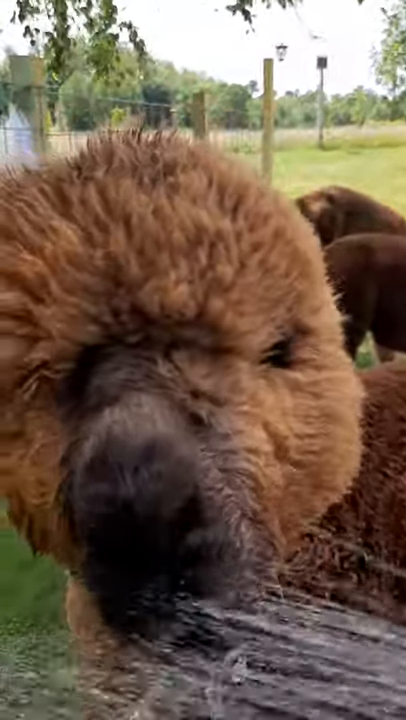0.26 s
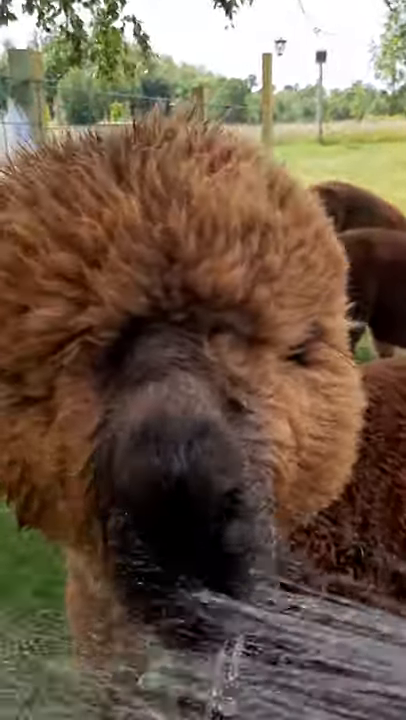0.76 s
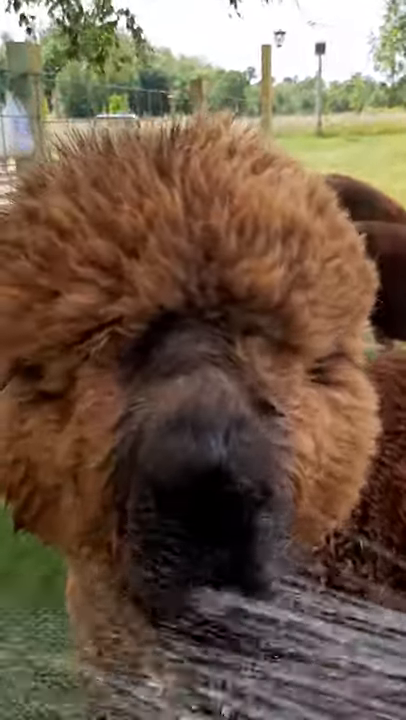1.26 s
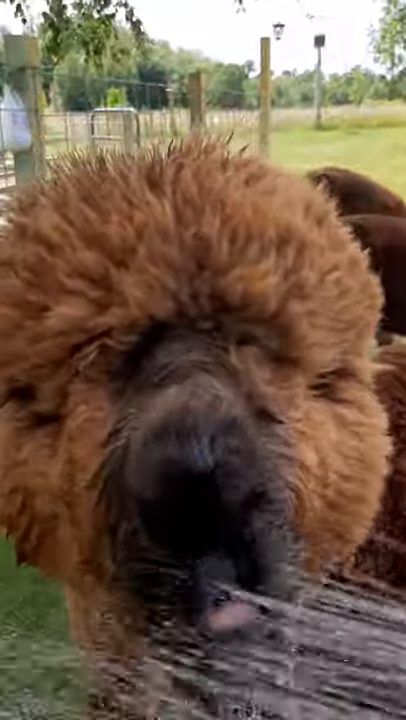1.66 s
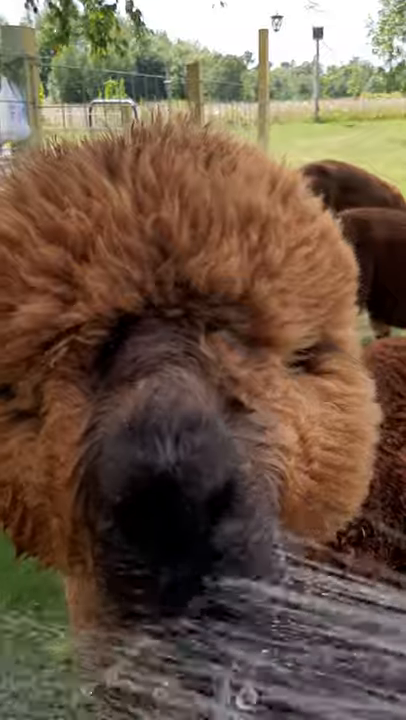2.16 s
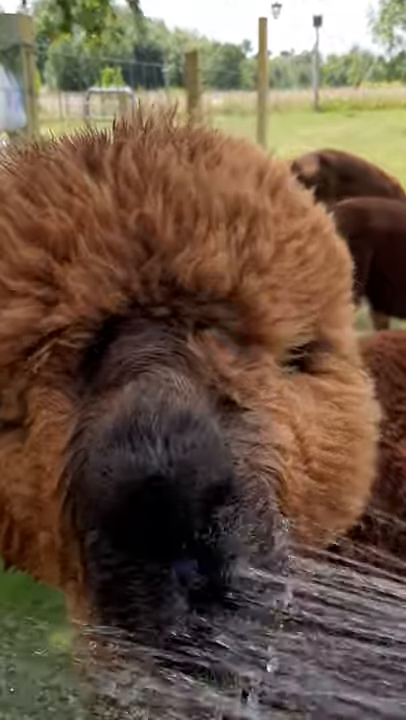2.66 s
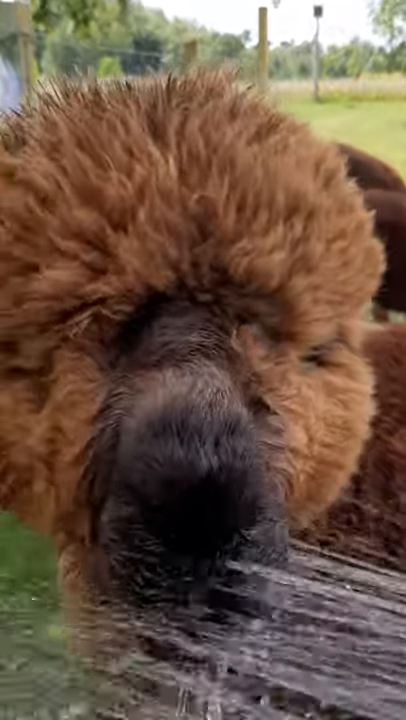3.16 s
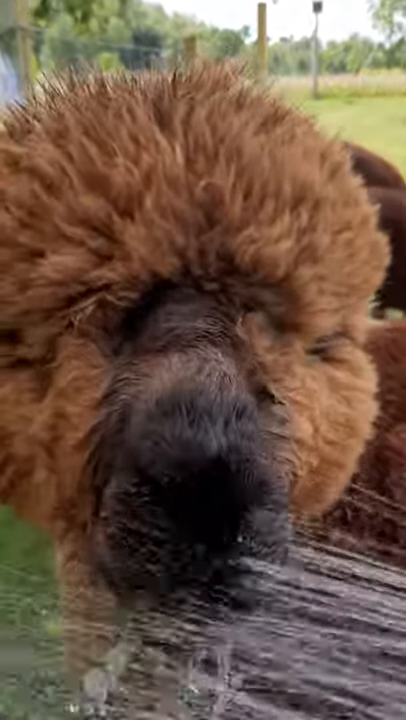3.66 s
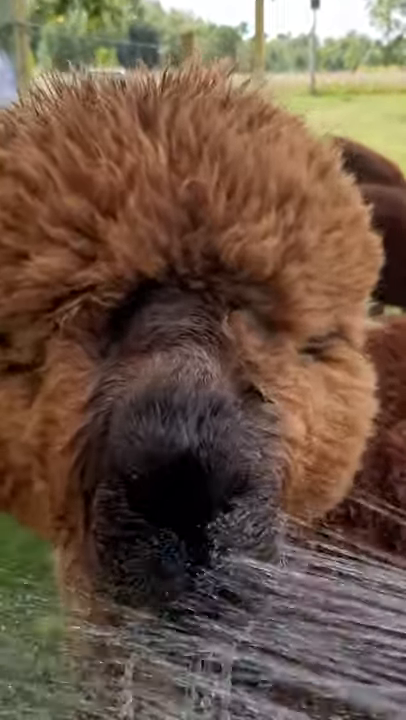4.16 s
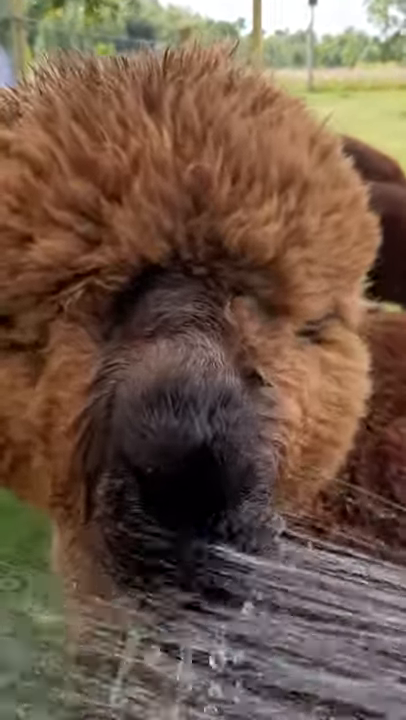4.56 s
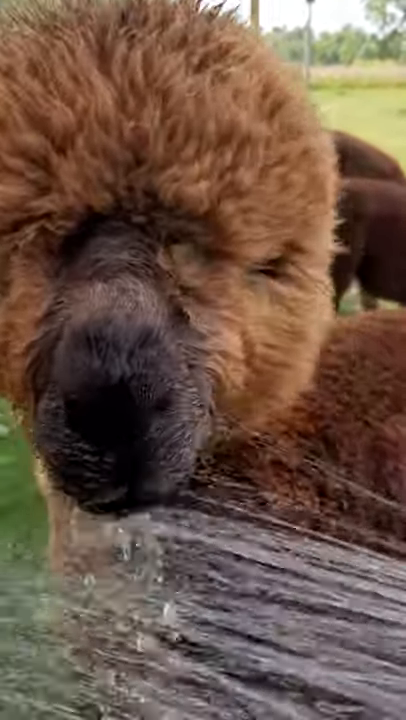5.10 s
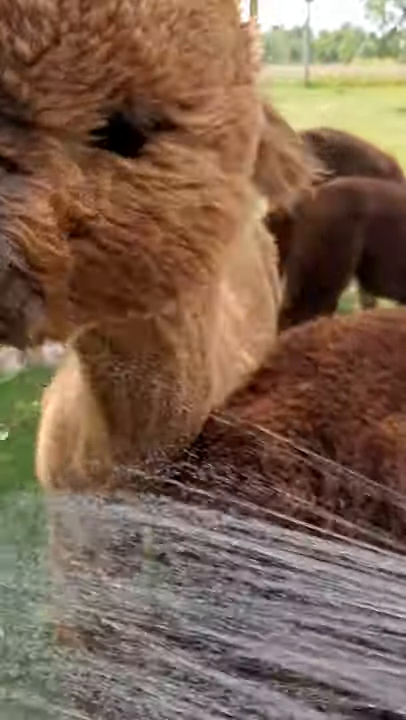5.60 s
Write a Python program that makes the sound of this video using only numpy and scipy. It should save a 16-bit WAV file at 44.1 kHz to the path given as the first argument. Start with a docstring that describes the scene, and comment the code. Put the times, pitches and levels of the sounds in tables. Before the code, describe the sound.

In an open paddock, an alpaca drinks from a hose spray right beside a stereo microphone. From the start, fine water hisses and crackles on its muzzle, over a quieter, steady patter on grass. Irregular short laps make swishy slurps, mostly gliding downward, mixed with bright wet lip smacks and hollow tongue clucks; a strong smack and clucks come near 2.0 seconds, and more clucks around 2.5. The spray strengthens after about 2.3. Low wind puffs buffet the microphone throughout, strongest around 2.7 to 3.0, with a sharp close drop slap at 2.9. Short watery gurgles come near 3.6 and 3.8, then the spray surges in brisk misty bursts from about 3.8 to 4.8 amid further smacks. A last slurp comes at 5.0. From about 5.2 the head turns away: the hiss falls off, leaving small drips, ticking drops, soft grass patter and fading breeze.

```python
"""An alpaca laps at the spray of a garden hose, close to the microphone, in an open paddock.
Each lap rings a mouth cavity with a gliding pitch; lips smack and the tongue clucks, as short decaying rings.
Showers of tiny grains over noise make the spray hiss on its muzzle and patter on the grass.
Shaped noise makes a light breeze that buffets the microphone. Near the end the head turns away and the spray fades."""
import sys
import numpy as np
from scipy import signal
from scipy.fft import rfft, irfft, next_fast_len
from scipy.io import wavfile
from scipy.ndimage import uniform_filter1d, map_coordinates

SR = 44100
rng = np.random.default_rng(int(sys.argv[2]) if len(sys.argv) > 2 else 0)


def output_pcm(signal):
    """Save a mono or channel-first signal as 16-bit PCM at the path in sys.argv[1].

    Samples are clipped to [-1, 1] before scaling.
    """
    pcm = np.clip(np.atleast_2d(signal).T, -1, 1) * 32767
    wavfile.write(sys.argv[1], SR, np.round(pcm).astype(np.int16))


N = 257455
TIME_S = np.arange(N) / SR


def amp(db):
    """Decibels to gain."""
    return 10 ** (np.asarray(db) / 20)


def unit(x):
    """Scale to rms 1."""
    return x / np.sqrt(np.mean(np.abs(x) ** 2) + 1e-20)


def along(points, hz):
    """Interpolate (Hz, value) points on a log frequency axis."""
    point_hz, values = np.transpose(points)
    return np.interp(np.log(hz + 1), np.log(point_hz + 1), values)


def curve(rows):
    """Interpolate (s, value) rows to one value per sample."""
    time_s, values = np.transpose(rows)
    return np.interp(TIME_S, time_s, values)


def wobble(rate_hz):
    """Smooth random curve, rate_hz knots a second."""
    knots = rng.standard_normal(int(N * rate_hz / SR) + 4)
    return map_coordinates(knots, [TIME_S * rate_hz])


def arch(middle_s, length_s):
    """Smooth rise from 0 to 1 and back."""
    return np.cos(np.pi * np.clip((TIME_S - middle_s) / length_s, -.5, .5)) ** 2


def filtered(x, response):
    """Multiply the spectrum of x by a response of frequency."""
    size = next_fast_len(N + SR // 4)
    spectrum = rfft(x, size) * response(np.fft.rfftfreq(size, 1 / SR))
    return irfft(spectrum, size)[..., :N]


def coloured(x, spectrum):
    """Shape x by a spectrum, at rms 1."""
    return unit(filtered(x, lambda hz: amp(along(spectrum, hz))))


def pan(left_db):
    """Channel gains for a left-minus-right level."""
    return amp([[left_db / 2], [-left_db / 2]])


def from_right(x, lag_s):
    """Sound reaches the right port lag_s before the left."""
    return filtered(x, lambda hz: np.exp(1j * np.pi * hz * lag_s * np.array([[-1], [1]])))


def add(track, start_s, sound):
    """Mix a sound into the track at start_s."""
    part = track[max(0, round(start_s * SR)):][:len(sound)]
    part += sound[:len(part)]


# Laps: (start [s], length [s], pitch at start [Hz], middle [Hz], end [Hz], relative level [dB])
LAPS = [(0.063, 0.089, 4000, 3280, 2460, -49), (0.145, 0.062, 3900, 3710, 3750, -45),
        (0.251, 0.016, 2500, 2520, 2700, -42.5), (0.372, 0.13, 4610, 1700, 810, -52.5),
        (0.498, 0.11, 4100, 3800, 3430, -49), (0.646, 0.11, 4200, 2780, 2460, -51),
        (1.085, 0.077, 4900, 3900, 2570, -46), (1.139, 0.018, 3475, 3175, 2900, -34),
        (1.303, 0.12, 4800, 3550, 3120, -48), (1.557, 0.094, 4300, 3040, 2470, -42.5),
        (1.729, 0.13, 3900, 3100, 2400, -47), (1.831, 0.06, 1884, 1570, 1700, -56),
        (2.06, 0.065, 2254, 2126, 2220, -51.5), (2.253, 0.094, 4200, 3500, 3130, -44),
        (2.427, 0.096, 4760, 3440, 2415, -39), (2.658, 0.11, 4190, 3410, 2930, -39),
        (2.779, 0.0563, 1730, 1117, 1750, -51), (2.916, 0.09, 1566, 1676, 1430, -53.5),
        (3.143, 0.069, 2050, 2080, 2440, -54), (3.737, 0.12, 3670, 4410, 3910, -44),
        (3.97, 0.086, 3400, 2400, 1350, -45.5), (4.444, 0.11, 4140, 3550, 2330, -47.5),
        (4.726, 0.041, 3260, 3060, 3470, -40.5), (4.76, 0.053, 2250, 1950, 2420, -50.5),
        (4.973, 0.11, 4320, 3300, 2180, -51)]


def laps(whistle_width_hz, swish_width_hz, scatter_db, clump_rate_hz):
    """Clumped droplet impacts ring the mouth cavity; its trembling pitch glides as the lips open and close."""
    out = np.zeros(N)
    noise = rng.standard_normal(N) + 1j * rng.standard_normal(N)
    impacts = noise * amp(scatter_db * wobble(clump_rate_hz))

    def band(width_hz):
        """Impacts through a resonance centred on 0 Hz, to be shifted to the cavity pitch."""
        return unit(signal.lfilter(*signal.butter(2, width_hz / 2, fs=SR), impacts))

    whistle, swish = band(whistle_width_hz), band(swish_width_hz)
    tremble = 1 + .035 * wobble(70)
    for start_s, length_s, *pitches_hz, db in LAPS:
        u = np.linspace(0, 1, int(length_s * SR))
        span = int(start_s * SR) + np.arange(len(u))
        glide = np.polyfit([0, .5, 1], np.log(pitches_hz), 2)
        hz = np.exp(np.polyval(glide, u)) * tremble[span]
        # low pitch (deep cavity): soft whistle; high pitch (shallow cavity): swish
        shallow = 1 / (1 + (2300 / hz) ** 5)
        ring = (1 - shallow) * whistle[span] / 2 + shallow * swish[span]
        tone = np.real(ring * np.exp(2j * np.pi * np.cumsum(hz) / SR))
        add(out, start_s, amp(db) * unit(tone) * np.sqrt(np.abs(np.sin(np.pi * u))))
    return out


def pops(rows, cycles, attack_s, rise, splash_db, splash_s, splash_ratio, splash_octaves):
    """A water film snaps: its pocket rings briefly, with a band of noise spatter; rise is the relative pitch sweep."""
    out, t = np.zeros(N), np.arange(SR // 16) / SR
    bins_hz = np.fft.rfftfreq(len(t), 1 / SR) + 1
    for start_s, db, hz in rows:
        fade = np.exp(-t * hz / cycles)
        swell = 1 - np.exp(-(t / attack_s) ** 2)
        sweep_hz = hz * (1 + rise * (.5 - fade))
        ring = fade * swell * np.sin(2 * np.pi * np.cumsum(sweep_hz) / SR)
        octaves_off = np.log2(bins_hz / (hz * splash_ratio))
        band = np.exp(-.5 * (octaves_off / splash_octaves) ** 2)
        noise = unit(irfft(rfft(rng.standard_normal(len(t))) * band, len(t)))
        spatter = noise * swell * np.exp(-t / splash_s)
        add(out, start_s, amp(db) * (ring / np.abs(ring).max() + amp(splash_db) * spatter))
    return out


# Lip and tongue smacks: (time [s], relative ring level [dB], nominal pitch [Hz])
SMACKS = [(0.2755, -33.5, 4640), (0.4145, -32.5, 2820), (0.712, -31.5, 2780), (1.0296, -33, 3600),
          (1.1425, -25.5, 3280), (1.4476, -31, 4770), (1.9707, -22, 4240), (2.2016, -30, 3380),
          (2.2132, -36, 4400), (3.5628, -30, 4260), (4.0325, -31, 6160), (4.4438, -25, 5470),
          (4.6473, -28.5, 5370), (4.7567, -26, 4460)]


def smacks():
    """Wet lips and tongue part: short rings that rise in pitch."""
    return pops(SMACKS, cycles=4.9, attack_s=.0003, rise=0.21,
                splash_db=-13.0, splash_s=0.012, splash_ratio=1, splash_octaves=0.45)


# Mouth water churns: (start [s], end [s], relative bubble level [dB])
GURGLES = [(3.553, 3.619, -47.5), (3.741, 3.836, -42)]


def gurgles(count, low_hz, high_hz, scatter_octaves, front_db):
    """Rows for runs of small crowded clucks, scattered about a sinking pitch."""
    rows = []
    for start_s, end_s, db in GURGLES:
        late, pitch = rng.random((count, 2)).T
        when = (np.arange(count) + late) / count
        sinking_hz = high_hz * (low_hz / high_hz) ** when
        hz = sinking_hz * 2 ** (scatter_octaves * (pitch - .5))
        rows += [(start_s + u * (end_s - start_s), db, f, front_db) for u, f in zip(when, hz)]
    return rows


DEEP_DECAY_S, SECOND_ABOVE_HZ, SECOND_DB = 0.0031, 714, -11  # deep mouth resonances
FRONT_HZ, FRONT_DECAY_S, CRACK_DB = 4040, 0.0017, 2  # cavity behind the lips; crack over it
# Tongue clucks: (time [s], relative level [dB], deep resonance [Hz], crack and front cavity over that [dB])
CLUCKS = [(0.532, -36.5, 664, 1.5), (0.563, -42, 503, -2), (1.529, -35.5, 516, -20), (1.9705, -32, 482, 3),
          (1.9795, -32, 1390, 3.5), (2.2175, -33.5, 1580, 7.5), (2.228, -39.5, 1550, 7.5),
          (2.546, -34.5, 970, 3), (2.5897, -29, 775, 1), (3.556, -37, 1460, -15), (3.577, -34.5, 790, -14),
          (3.607, -36.5, 785, -12), (3.808, -34, 686, -10), (3.8238, -33, 483, 4), (3.8395, -30, 565, 0.5),
          (3.8422, -32.5, 520, 7.5), (4.389, -36, 850, -17), (4.626, -43.5, 1300, -6),
          (4.794, -40.5, 850, -10)]


def clucks():
    """Tongue leaves the wet palate: a crack, two deep mouth resonances and the small cavity behind the lips."""
    out, t = np.zeros(N), np.arange(SR // 30) / SR
    rows = list(CLUCKS) + gurgles(count=26, low_hz=477, high_hz=870, scatter_octaves=1.18, front_db=-5)

    def ring(hz, decay_s):
        """Decaying sine."""
        return -np.sin(2 * np.pi * hz * t) * np.exp(-t / decay_s)

    for start_s, db, hz, front_db in rows:
        deep = ring(hz, DEEP_DECAY_S) + amp(SECOND_DB) * ring(hz + SECOND_ABOVE_HZ, DEEP_DECAY_S / 2)
        front = ring(FRONT_HZ * amp(.5 * rng.standard_normal()), FRONT_DECAY_S)
        crack = rng.standard_normal(len(t)) * np.exp(-2 * t / FRONT_DECAY_S)
        crack = signal.lfilter(*signal.butter(2, FRONT_HZ, fs=SR), crack)
        add(out, start_s, amp(db) * (deep + amp(front_db) * (front + amp(CRACK_DB) * crack)))
    return out


# Single large drops: (time [s], relative ring level [dB], pitch [Hz])
DROPS = [(0.3285, -32.5, 13000), (0.3645, -34.5, 7100), (0.7751, -41.5, 7140), (1.916, -29, 10300),
         (2.0003, -30, 7800), (2.9228, -30.5, 7500), (4.8233, -28, 14500), (5.2116, -32.5, 11600),
         (5.2215, -35, 7860), (5.4075, -38.5, 8000), (5.6466, -42.5, 9600)]


def drops():
    """Large drops strike: short steady rings with broad spatter."""
    return pops(DROPS, cycles=6.9, attack_s=0.00071, rise=0,
                splash_db=-0.5, splash_s=0.0023, splash_ratio=1, splash_octaves=1.0)


# Drips off the chin: (time [s], relative ring level [dB], pitch [Hz])
DRIPS = [(3.153, -38, 2070), (5.3108, -37, 2490), (5.3943, -39.5, 2480), (5.3946, -39, 4330)]


def drips():
    """Drips fall from the chin and ping: longer steady rings, with spatter centred above them."""
    return pops(DRIPS, cycles=11.0, attack_s=0.00017, rise=0,
                splash_db=-3.5, splash_s=0.0014, splash_ratio=1.4, splash_octaves=0.36)


def mouth():
    """Sum of the close wet sounds at the muzzle."""
    slurps = laps(whistle_width_hz=130, swish_width_hz=740, scatter_db=2.5, clump_rate_hz=300)
    return amp(-1.5) * slurps + smacks() + clucks() + amp(5.5) * drops() + drips()


def ports(x, lag_s, echo_db, echo_s):
    """Muzzle is nearer the right port; animal and ground scatter a faint short echo."""
    t = np.arange(SR // 12) / SR
    tail = rng.standard_normal((2, len(t))) * np.exp(-t / echo_s)
    echo = signal.fftconvolve(x[None], tail / np.linalg.norm(tail[0]), axes=1)[:, :N]
    return (from_right(x, lag_s) + amp(echo_db) * echo) * pan(-4.0)


# Stray drop beside the right port: (time [s], relative ring level [dB], nominal pitch [Hz])
SLAPS = [(2.9206, -9, 4030)]


def slap():
    """A stray drop slaps so close that it reaches the right port earlier and louder."""
    hit = pops(SLAPS, cycles=3.6, attack_s=0.00045, rise=0.46,
               splash_db=-15.0, splash_s=0.011, splash_ratio=1.03, splash_octaves=0.42)
    return from_right(hit, lag_s=0.00011) * pan(-6.5)


def droplets(rate_hz, scatter_db, cycles, low_hz, high_hz, size=128):
    """Shower of tiny impacts: decaying sines of random time, pitch and strength."""
    t = np.arange(size) / SR
    when, pitch, weight, phase = rng.random((int(rate_hz * N / SR), 4)).T[:, :, None]
    hz = low_hz + pitch * (high_hz - low_hz)
    strength = amp(scatter_db * np.minimum(-np.log(1 - weight), 6))
    fade = np.exp(-t * hz / cycles)
    grains = strength * np.sqrt(hz) * fade * np.sin(2 * np.pi * (hz * t + phase))
    places = (when * N).astype(int) + np.arange(size)
    return unit(np.bincount(places.ravel(), grains.ravel(), N)[:N])


# Stereo image: (frequency [Hz], left-right likeness [0-1])
ALIKE = [(300, 0.53), (700, 0.73), (2000, 0.11), (4000, 0.53), (8000, 0.078)]


def spread(pair):
    """Mix two unrelated signals into stereo, with left-right likeness set by frequency."""
    def turn(hz):
        return np.arccos(np.clip(along(ALIKE, hz), -1, 1)) / 2

    mid, side = filtered(pair, lambda hz: np.array([np.cos(turn(hz)), np.sin(turn(hz))]))
    return np.array([mid + side, mid - side])


def shower(spectrum, rate_hz, scatter_db, hiss_db, cycles, low_hz, high_hz):
    """Stereo droplets over the smooth hiss of those too small to tell apart."""
    grains = np.array([droplets(rate_hz, scatter_db, cycles, low_hz, high_hz) for _ in range(2)])
    hiss = amp(hiss_db) * rng.standard_normal((2, N))
    return coloured(spread(grains + hiss), spectrum)


def patchy(pair, depth_db):
    """Shifting water films favour ever-changing pitches for a few hundredths of a second."""
    z = signal.stft(pair, nperseg=512)[2]
    field = uniform_filter1d(rng.standard_normal(z.shape[1:]), size=7, axis=0)
    field = uniform_filter1d(field, size=5, axis=1)
    return signal.istft(z * amp(depth_db * unit(field)), nperseg=512)[1][:, :N]


# Splash and mist spectra: (frequency [Hz], relative density [dB/Hz])
SPLASH = [(300, -17.5), (700, -6.5), (1200, -12.5), (2400, -8.5), (3500, -1), (5000, -1), (6500, -2.5),
          (7700, -1), (8400, -13.5), (10000, -11.5), (16000, -4.5)]
MIST = [(5000, -11.5), (8500, -1.5), (9700, -5.5), (10800, 0), (12000, 1), (13000, 1), (16000, -2.5)]
# How squarely the jets strike the muzzle: (time [s], relative level [dB])
CONTACT = [(0.0, -57), (2.1, -52.5), (2.4, -48.5), (4.3, -51), (4.9, -50), (5.19, -57), (5.25, -62.5),
           (5.84, -66)]
# Lips push into the jets: (middle [s], length [s], splash gain [dB], mist gain [dB])
SURGES = [(0.16, 0.052, 6, 4.5), (0.39, 0.13, 2.5, 2), (0.85, 0.1, 3, 5.5), (1.073, 0.076, 3, 4),
          (1.56, 0.25, 6, -1), (2.446, 0.2, 3, -1), (2.814, 0.062, 2, 5), (3.02, 0.12, 3, 4.5),
          (3.258, 0.13, 3.5, 8), (3.53, 0.15, 2, 5), (3.793, 0.2, 3.5, 4.5), (3.943, 0.088, 8, 9.5),
          (4.032, 0.11, 6, 6), (4.161, 0.16, 6, 11), (4.249, 0.074, 6, 2), (4.455, 0.15, 4.5, 0.5),
          (4.684, 0.18, 1.5, 11), (4.754, 0.17, 3.5, 2)]
SPLASH_OVER_CONTACT_DB, MIST_OVER_CONTACT_DB = 4.0, 2.35
SURGE_EDGE = 0.31  # exponent; below 1: fast rise, broad top
FLUTTER_DB = 1.4


def spray():
    """Jets break on wet fur and lips: coarse splash, sharp ticks and fine mist surge and flutter together."""
    contact_db = curve(CONTACT)
    splash_db = contact_db + SPLASH_OVER_CONTACT_DB
    mist_db = contact_db + MIST_OVER_CONTACT_DB
    for middle_s, length_s, splash_gain_db, mist_gain_db in SURGES:
        push = arch(middle_s, length_s) ** SURGE_EDGE
        splash_db = splash_db + splash_gain_db * push
        mist_db = mist_db + mist_gain_db * push
    flutter_db = FLUTTER_DB * wobble(70)
    splash = shower(SPLASH, rate_hz=3000, scatter_db=0.5, hiss_db=0, cycles=1.9, low_hz=1120, high_hz=10180)
    ticks = droplets(rate_hz=1100, scatter_db=3.3, cycles=0.8, low_hz=3040, high_hz=11700)
    splash = unit(patchy(splash, depth_db=2.1) + coloured(ticks, SPLASH) / 2)
    mist = shower(MIST, rate_hz=3500, scatter_db=4.0, hiss_db=0, cycles=0.8, low_hz=8000, high_hz=15600)
    mist = patchy(mist, depth_db=2.5)
    water = splash * amp(splash_db + flutter_db) * pan(-1.5)
    water += mist * amp(mist_db + flutter_db) * pan(-2.2)
    return from_right(water, lag_s=.00002)


# Grass patter spectrum: (frequency [Hz], relative density [dB/Hz])
GRASS = [(120, -59), (250, -4), (400, -1.5), (550, -2.5), (700, 0), (1000, -8), (1400, -5), (1800, -6.5),
         (2350, -1), (3000, -8.5), (5200, -7), (7500, -18), (16000, -72)]


def grass():
    """Water that misses the animal patters steadily on the ground."""
    patter = shower(GRASS, rate_hz=3000, scatter_db=1.0, hiss_db=-0.5, cycles=2.9, low_hz=415, high_hz=15230)
    return patter * amp(-55.5)


# Buffet, flap and rumble spectra: (frequency [Hz], relative density [dB/Hz])
BUFFET = [(20, -63), (55, 3.5), (125, 5), (240, -12.5), (380, -5), (600, -20), (1500, -79)]
FLAP = [(80, -41), (150, -2), (290, -6), (600, -29), (1500, -76)]
RUMBLE = [(20, -27), (45, -3), (70, 2), (110, -7), (200, -52)]
# Breeze between gusts: (time [s], relative level [dB])
LULL = [(0.0, -55), (2.9, -51.5), (3.4, -55), (5.84, -67)]
# Gusts on the microphone: (middle [s], length [s], relative level [dB])
GUSTS = [(0.01, 0.049, -43.5), (0.15, 0.24, -43.5), (0.236, 0.043, -41), (0.421, 0.09, -47.5),
         (0.922, 0.23, -44), (1.34, 0.27, -45), (1.473, 0.1, -40), (1.989, 0.2, -44.5),
         (2.735, 0.099, -40.5), (2.813, 0.11, -36.5), (2.951, 0.099, -34.5), (3.035, 0.12, -42),
         (4.214, 0.046, -48), (5.1, 0.37, -56.5), (5.8, 0.038, -50)]
GUST_STEEPNESS = 4.6  # build and decay rate, over the gust length
FLAP_DB, STRONG_GUST_DB = -45.5, -39  # flap level at that breeze level, before the port tilt
FLAP_GROWS = 1.35  # dB of flap per dB of breeze


def breeze():
    """Eddies buffet each port separately and flap in strong gusts; a low outdoor rumble swells with them."""
    power = amp(curve(LULL)) ** 2
    for middle_s, length_s, db in GUSTS:
        phase = np.clip(GUST_STEEPNESS * (TIME_S - middle_s) / length_s, -20, 20)
        power = power + (amp(db) / np.cosh(phase)) ** 2
    level_db = 10 * np.log10(power)
    eddies = amp(4.3 * np.array([wobble(55), wobble(55)]))
    buffet = unit(eddies * coloured(rng.standard_normal((2, N)), BUFFET)) * amp(level_db)
    flap = unit(eddies * coloured(rng.standard_normal((2, N)), FLAP))
    flap = flap * amp(FLAP_DB + FLAP_GROWS * (level_db - STRONG_GUST_DB))
    rumble = coloured(rng.standard_normal((2, N)), RUMBLE)
    rumble = rumble * amp(-54.0 + 0.64 * (level_db - level_db.mean()))

    def port_tilt(hz):
        """Left port takes more below 160 Hz, right port above 280 Hz."""
        left_minus_right_db = along([(160, 7.5), (280, -6.5)], hz)
        return amp(left_minus_right_db * np.array([[.5], [-.5]]))

    return filtered(buffet + flap + rumble, port_tilt)


def scene():
    """Drinking, spray, grass and breeze together."""
    drinking = ports(mouth(), lag_s=.000046, echo_db=-13, echo_s=0.0076)
    return drinking + slap() + spray() + grass() + breeze()


# Microphone colour: (frequency [Hz], gain [dB])
PORT = [(1250, 0), (1550, 3), (1830, -3), (2150, 1), (2600, -3), (7800, 0), (8600, -6.5), (10000, 0)]


def record(dry):
    """Microphone colour and a 16050 Hz band limit."""
    return filtered(dry, lambda hz: amp(along(PORT, hz)) * (hz < 16050))


dry = scene()
out = record(dry)
output_pcm(out)
```